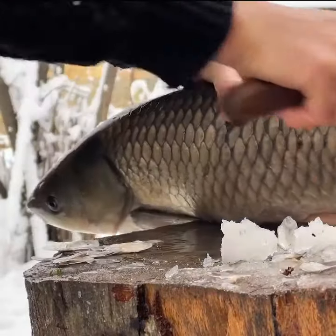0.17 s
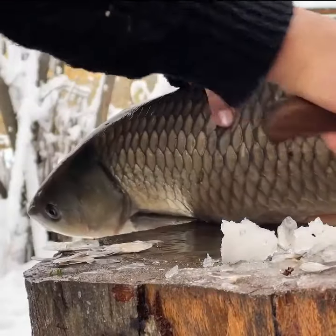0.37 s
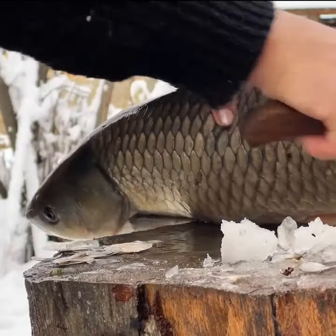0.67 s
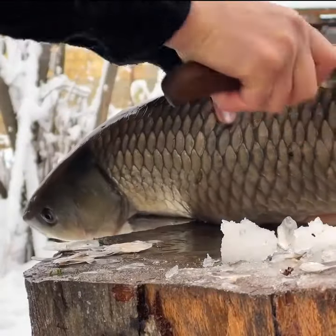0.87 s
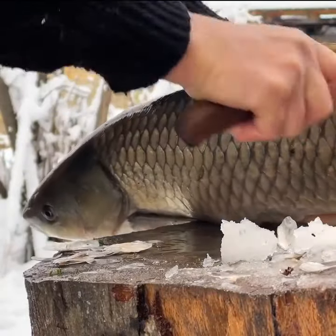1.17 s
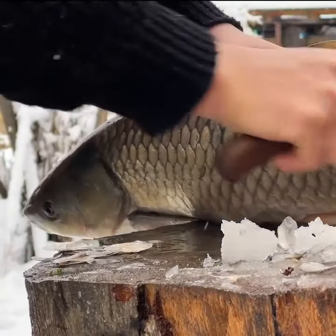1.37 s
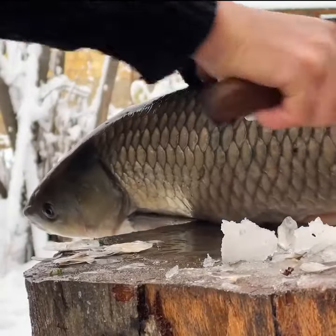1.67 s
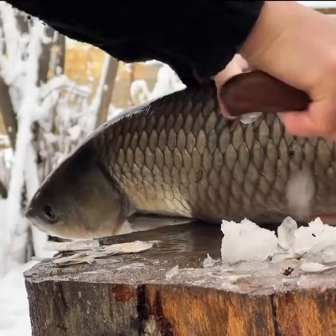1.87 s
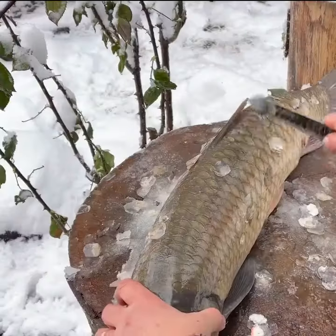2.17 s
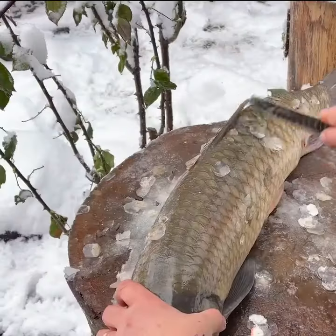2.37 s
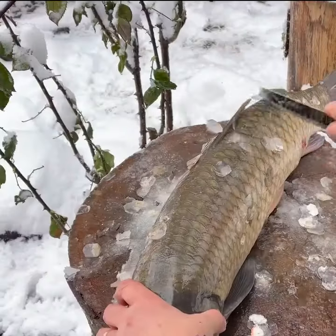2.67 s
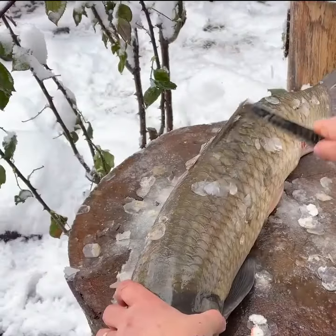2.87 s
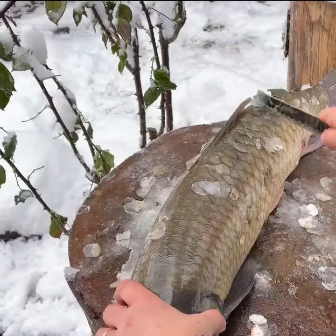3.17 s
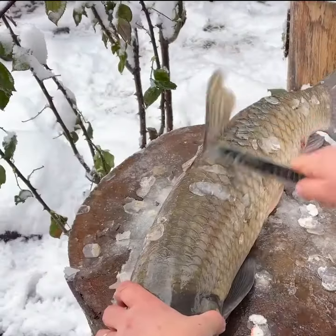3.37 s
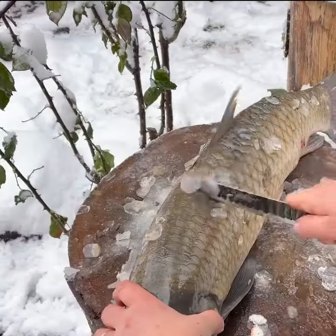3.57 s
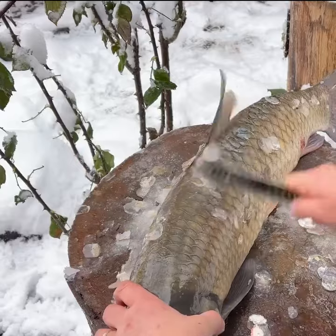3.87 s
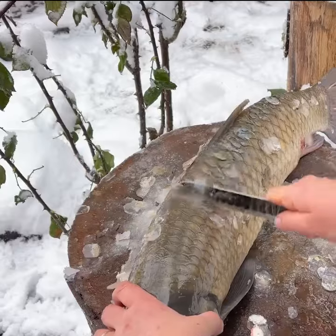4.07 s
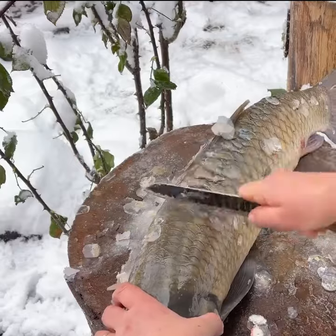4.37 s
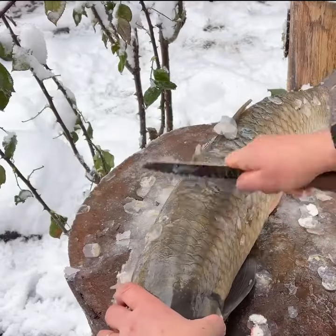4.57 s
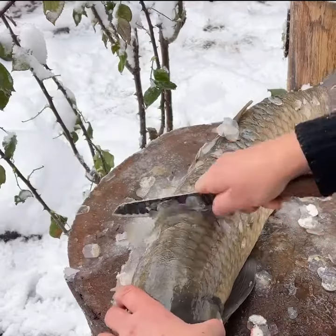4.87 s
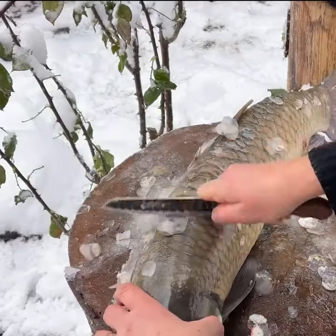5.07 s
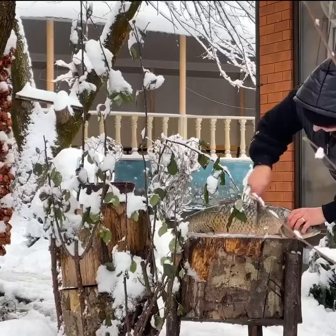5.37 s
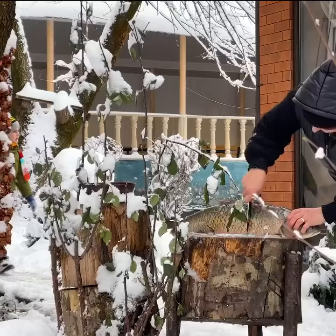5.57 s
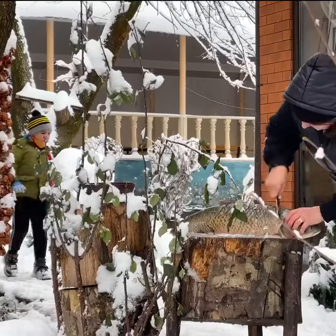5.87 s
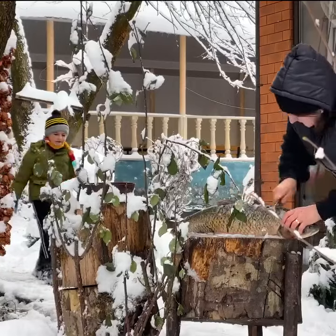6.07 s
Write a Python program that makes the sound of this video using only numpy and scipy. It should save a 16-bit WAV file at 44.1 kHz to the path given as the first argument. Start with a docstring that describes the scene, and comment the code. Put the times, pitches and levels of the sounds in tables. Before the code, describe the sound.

Fast rhythmic fish scaling outdoors: dry, gritty scrapes with sharp little snaps and soft body thumps, close at first, then suddenly faint and distant.

```python
"""A knife scales a big carp on a tree stump in a snowy yard, about six strokes a second.
Each stroke is a crackle of random slips with sharp noise-burst snaps and a dull push on the flesh;
the blade slides back lightly over wet skin, and the fish knocks, rings and thumps in falling tones.
It is heard from in front, from above, then from afar, over rumble and faint air. A low hum accompanies
the first place; a distant engine is a wavering tone whose pulls climb in pitch."""
import sys
import numpy as np
from scipy import signal
from scipy.fft import rfft, irfft, next_fast_len
from scipy.io import wavfile
from scipy.ndimage import uniform_filter1d, map_coordinates

SR = 44100
rng = np.random.default_rng(int(sys.argv[2]) if len(sys.argv) > 2 else 0)


def put_to_file(sound):
    """Save the sound as 16-bit audio at rate SR, in the file named by the first command-line argument."""
    columns = np.atleast_2d(sound).T  # one column per channel
    safe = np.clip(columns, -1, 1)
    whole_steps = np.round(safe * 32767)
    wavfile.write(sys.argv[1], SR, whole_steps.astype(np.int16))


N = 274302
T = np.arange(N) / SR

# blade strokes: (middle [s], half-power length [s], relative crackle level [dB],
# relative flesh level [dB], relative way-back level [dB], way back after the middle [s])
STROKES = [(0.108, 0.023, -33, -67, -44, 0.098), (0.263, 0.022, -33.5, -53, -50.5, 0.082),
           (0.416, 0.028, -34, -57, -46.5, 0.07), (0.568, 0.018, -31.5, -50, -49.5, 0.061),
           (0.722, 0.028, -32, -52, -51.5, 0.065), (0.872, 0.022, -36, -55.5, -48.5, 0.053),
           (1.026, 0.036, -41.5, -65.5, -48.5, 0.086), (1.162, 0.028, -37.5, -59, -49.5, 0.08),
           (1.305, 0.035, -41, -62, -49, 0.087), (1.471, 0.047, -43, -59, -52, 0.081),
           (1.632, 0.025, -40, -61, -46, 0.063), (1.778, 0.022, -35.5, -59, -51.5, 0.09),
           (1.938, 0.031, -37, -61, -48, 0.093), (2.111, 0.042, -35.5, -50.5, -45, 0.087),
           (2.271, .045, -36, -55, -55, 0.088), (2.431, .028, -37, -52, -61, 0.073),
           (2.588, 0.031, -36.5, -48.5, -64, 0.061), (2.75, 0.03, -36, -56, -61.5, 0.054),
           (2.917, 0.031, -37.5, -51, -55, 0.056), (3.076, 0.026, -35, -50.5, -58, 0.083),
           (3.241, 0.024, -36, -47.5, -54, 0.035), (3.403, 0.026, -30.5, -54, -68, 0.042),
           (3.572, 0.034, -38.5, -53, -60, 0.064), (3.728, 0.019, -40, -48, -52, 0.031),
           (3.892, 0.025, -34.5, -50.5, -49, 0.021), (4.048, 0.019, -38, -50.5, -54.5, 0.11),
           (4.209, 0.023, -33.5, -45, -54.5, 0.06), (4.356, 0.025, -35, -52, -52, 0.058),
           (4.521, 0.02, -37.5, -48, -51.5, 0.069), (4.693, 0.028, -35, -45, -54.5, 0.093),
           (4.848, 0.022, -35, -49.5, -59, 0.072), (5.016, .031, -33, -45.5, -53.5, 0.11),
           (5.188, 0.024, -35, -47, -55.5, 0.077), (5.359, 0.037, -46, -50, -78, 0.057),
           (5.51, 0.046, -59, -80, -65, 0.066), (5.67, 0.044, -63, -64.5, -67, 0.074),
           (5.769, 0.025, -61, -79, -62.5, 0.082), (5.879, 0.021, -65, -61, -67, 0.08),
           (5.976, 0.04, -68, -89, -59, 0.055), (6.095, 0.061, -74, -65, -68, 0.052)]
# changes of listening place: (time [s])
MOVES = [2.085, 5.44]


def amp(db):
    """Decibels to gain."""
    return 10 ** (np.asarray(db) / 20)


def unit(x):
    """x at rms 1."""
    return x / np.sqrt(np.mean(x ** 2) + 1e-20)


def noise():
    """White noise of rms 1."""
    return rng.standard_normal(N)


def pair(apart_db):
    """Two noises of joint rms 1: a common part plus independent parts at apart_db."""
    return unit(rng.standard_normal(N) + amp(apart_db) * rng.standard_normal((2, N)))


def wobble(rate_hz):
    """A smooth random curve, rate_hz knots a second."""
    knots = rng.standard_normal(int(N * rate_hz / SR) + 4)
    return map_coordinates(knots, [T * rate_hz])


def along(points, hz):
    """(frequency [Hz], value) points interpolated on a log axis."""
    f, v = np.transpose(points)
    return np.interp(np.log(hz + 1), np.log(f + 1), v)


def filtered(x, response):
    """x times a complex response of frequency."""
    m = next_fast_len(N + SR // 2)
    hz = np.fft.rfftfreq(m, 1 / SR)
    return irfft(rfft(x, m) * response(hz), m)[..., :N]


def coloured(x, points, size=4096):
    """x through a causal minimum-phase filter of energy 1 with the given colour."""
    gain = amp(along(points, np.fft.rfftfreq(size, 1 / SR)))
    cepstrum = irfft(np.log(gain))
    cepstrum[1:size // 2] *= 2
    cepstrum[size // 2 + 1:] = 0
    kick = irfft(np.exp(rfft(cepstrum)))
    kick /= np.linalg.norm(kick)
    return signal.fftconvolve(np.atleast_2d(x), kick[None], axes=1)[:, :N]


def dappled(x, depth_db, size=256, count=5):
    """Every scale has its own pitch: short time-frequency patches of random gain."""
    z = signal.stft(x, nperseg=size)[2]
    field = uniform_filter1d(rng.standard_normal(z.shape), size=count, axis=0)
    field = unit(uniform_filter1d(field, size=4, axis=1))
    gain = unit(amp(depth_db * np.clip(field, -2, 2)))
    return signal.istft(z * gain, nperseg=size)[1][:N]


def drone(hz):
    """A low tone of rms 1, unsteady in pitch and level."""
    pitch_waver, flutter_db = .022, 3.5  # pitch waver as a share of hz
    phase = 2 * np.pi * np.cumsum(hz * (1 + pitch_waver * wobble(29.05))) / SR
    return unit(amp(flutter_db * wobble(13)) * np.sin(phase))


def yard():
    """Each listening place has its own distant rumble and faint air; a low hum is heard at the first."""
    # background per listening place: (relative rumble level [dB], relative air level [dB])
    background = [(-57.5, -66.5), (-65.5, -69), (-67, -69)]
    # hum tones: (frequency [Hz], relative level [dB])
    hum_tones = [(125.5, -58.5), (104.4, -72)]
    # hum level over time: (time [s], gain [dB])
    hum_swell = [(0, -1.5), (.5, -8), (1, 1.5), (1.5, -2.5), (2.2, -10.5)]
    # rumble colour: (frequency [Hz], relative gain [dB])
    rumble_colour = [(20, -36), (40, -22), (60, -7), (85, 0.5), (125, 6.5), (170, -6.5), (250, -14),
                     (500, -27.5)]
    # air colour: (frequency [Hz], relative gain [dB])
    air_colour = [(25, -40), (100, 2.5), (250, 8), (500, -2), (1000, 0.5), (2000, -4), (5000, -21),
                  (16000, -6)]
    place = np.searchsorted(MOVES, T)
    levels_db = np.array(background, float)[place]
    rumble_db, air_db = uniform_filter1d(levels_db, size=4096, axis=0).T
    swell = amp(np.interp(T, *np.transpose(hum_swell)))
    hum = (place == 0) * swell * sum(amp(db) * drone(hz) for hz, db in hum_tones)
    rumble_gain = amp(rumble_db + 0.69 * wobble(8.8))
    rumble = rumble_gain * coloured(pair(apart_db=-17.5), rumble_colour)
    air_gain = amp(air_db + 1.5 * wobble(7.1) - 0.5)
    air = air_gain * coloured(pair(apart_db=-1.0), air_colour)
    return hum + rumble + air


def crackle(rate_hz, spread_db, life_s, hiss_db):
    """Envelope of random tiny slips on a steady bed, its power evened out over 34 ms."""
    slip_power = amp(spread_db * np.clip(noise(), -2, 2)) ** 2
    slips = (rng.random(N) < rate_hz / SR) * slip_power
    t = np.arange(SR // 40) / SR
    power = np.abs(signal.fftconvolve(slips, t * np.exp(-3 * t / life_s))[:N])
    power = power / power.mean() + amp(hiss_db) ** 2
    return np.sqrt(power / np.abs(uniform_filter1d(power, size=1500)))


def pressure(levels_db, stretch, skirt_db):
    """The blade bites abruptly in each stroke, lets go more slowly and drags on lightly afterwards."""
    power = np.zeros(N)
    for (s, length_s, *_), db in zip(STROKES, levels_db):
        near = slice(max(0, int((s - .1) * SR)), int((s + .2) * SR))
        u = (T[near] - s) / (length_s * stretch)
        bite = 2 ** -(np.abs(2 * u) ** np.where(u < 0, 2.6, 1.8))
        skirt = amp(skirt_db) ** 2 * np.exp(-((u - .6) / 2.0) ** 2)
        power[near] += amp(db) ** 2 * (bite + skirt)
    return np.sqrt(power)


def each_stroke(heights, offsets_s, width_s):
    """A smooth bump of 1/e half-width width_s at a given time from the middle of every stroke."""
    out = np.zeros(N)
    for s, height in zip(np.transpose(STROKES)[0] + offsets_s, heights):
        near = slice(*np.searchsorted(T, [s - 4 * width_s, s + 4 * width_s]))
        out[near] += height * np.exp(-((T[near] - s) / width_s) ** 2)
    return out


def scales():
    """The edge settles with a thin hiss; then rows of scales catch on it and flick back."""
    # hiss colour: (frequency [Hz], relative gain [dB])
    touch_colour = [(1000, 13), (6000, -11), (11000, -18), (14500, 14.5)]
    touch_db, touch_lead_s, touch_width_s = -17.5, 0.036, 0.01  # dB re the stroke's table level
    levels_db = np.transpose(STROKES)[2]
    bite = pressure(levels_db, stretch=1.0, skirt_db=-23.5)
    slips = crackle(rate_hz=800, spread_db=5.5, life_s=.0009, hiss_db=-5)
    touch = each_stroke(amp(levels_db + touch_db), -touch_lead_s, touch_width_s)
    crunch = dappled(bite * slips * noise(), depth_db=4, size=384, count=14)
    hiss = coloured(touch * slips * noise(), touch_colour)[0]
    return amp(1.5) * crunch + hiss


def lesser_snaps(count):
    """Every stroke frees a few more scales at random moments: rows like the placed snaps."""
    level_db, level_spread_db = -5.5, 1.2  # re the stroke's crackle column
    bright_db, bright_spread_db, thick_db = 3, 4, -10
    scatter_lengths = .33  # time scatter in stroke lengths
    chance = np.clip(rng.standard_normal((len(STROKES), count, 3)), -2, 2)
    rows = []
    for (s, length_s, crackle_db, *_), draws in zip(STROKES, chance):
        for when, force, tint in draws:
            snap_s = s + scatter_lengths * length_s * when
            snap_db = crackle_db + level_db + level_spread_db * force
            rows.append((snap_s, snap_db, bright_db + bright_spread_db * tint, thick_db))
    return [row for row in rows if T[SR // 20] < row[0] < T[-1]]


def snaps(size=900):
    """A scale bends, then tears loose with a short crack at its own pitch; thick ones pop lower."""
    # snaps and ticks at set times, loud and faint:
    # (time [s], relative level [dB], brightness [dB], relative thickness [dB])
    placed_snaps = [(0.088, -21, 7.5, -9), (0.1144, -19, 1, -20), (0.243, -28, -14, -10),
                    (0.2647, -14.5, -18, -4), (.395, -28, -18, -23), (0.412, -17.5, -9, 2),
                    (0.557, -24.5, -8, -9), (0.5635, -26.5, -8, 4), (0.584, -23, 2, -3),
                    (0.6255, -26.5, 9, -19), (0.71, -15, 17, -18), (0.7312, -20, -20, -15.5),
                    (0.7374, -21, -8, -13), (0.749, -28, -2, -15), (0.8775, -25.5, 1, -7),
                    (1.151, -33, 1, 2), (1.176, -23.5, -15, -13), (1.1845, -18.5, 5, -2.5),
                    (1.2946, -25.5, 6, 0.5), (1.3467, -26, 5, -20), (1.611, -28, 12, -14),
                    (1.642, -22.5, 4, -25), (1.679, -29, -3, -20), (1.7734, -25, 21, -20),
                    (1.9338, -19.5, -2.5, -42), (1.969, -26, -1, -16), (2.0014, -24.5, 1, -47),
                    (2.0897, -14.5, 11, -26), (2.4215, -20, 6.5, -25), (2.5076, -30.5, 9, -26),
                    (2.7625, -21.5, 4, -14), (2.813, -32.5, 7, -30), (2.86, -48.5, 0, -21),
                    (2.921, -23, 10, 7), (2.977, -36, 6, -28), (3.078, -17, 16, -23),
                    (3.118, -33.5, -3, -14), (3.2464, -18, 3.5, -26), (3.291, -35, -16, -28),
                    (3.4057, -14.5, 11, -20), (3.558, -21, -15, -11), (3.569, -21, -15, -13.5),
                    (3.613, -32.5, -2, -12), (3.7233, -10, 8, -8), (3.734, -19.5, -9.5, -27),
                    (3.8776, -22.5, -5, -6), (3.894, -15.5, 4, -15), (3.925, -27, -3, -9),
                    (3.948, -38, -14, -27), (4.036, -24.5, -3, -9), (4.2158, -24, -19, -21),
                    (4.368, -18.5, 2.5, -8), (4.412, -39, -12, -6), (4.5311, -17, -8, -13),
                    (4.6729, -22.5, 11, -25), (4.7025, -7.5, 11, -8), (4.829, -30, 1, -7),
                    (5.023, -14, 0.5, -16), (5.0377, -14, 2.5, -17), (5.198, -17, 9.5, -23),
                    (5.3771, -26.5, 3, -18)]
    bend_s, tear_s, decay_s = .0011, .0004, .0018
    click = 3.5  # instant of release, over the tearing noise
    lead = size // 4
    out = np.zeros(N + size)
    t = (np.arange(size) - lead) / SR
    hz = np.fft.rfftfreq(size, 1 / SR)
    bend = .5 * np.exp(-np.abs(t) / bend_s)
    tear = .7 * np.exp(-np.abs(t) / tear_s) + np.exp(-np.abs(t) / decay_s)
    envelope = np.where(t < 0, bend, tear)
    for s, db, bright_db, thick_db in placed_snaps + lesser_snaps(count=6):
        ring_hz = 6500 * np.exp(0.5 * rng.standard_normal())
        ring_db = 4 * np.exp(-(np.log((hz + 1) / ring_hz) / 0.092) ** 2)
        shape = [(2600, thick_db + 11.5), (4000, 0), (8500, 0.008), (12000, bright_db)]
        burst = rng.standard_normal(size) * envelope + click * (t == 0)
        crack = irfft(rfft(burst) * amp(along(shape, hz) + ring_db), size)
        start = round(s * SR) - lead
        out[start:start + size] += amp(db + 15.0) * crack / np.linalg.norm(crack)
    return out[:N]


def slime(rate_hz, pitch_hz, life_cycles, size=320):
    """Films of slime burst under the sliding blade: tiny decaying sine pops a few cycles long."""
    pops = rng.standard_normal((int(rate_hz * N / SR), 2))
    start = rng.integers(0, N, len(pops))
    t = np.arange(size) / SR
    cycles = pitch_hz * np.exp(0.28 * pops[:, :1]) * t
    strength = amp(4 * np.clip(pops[:, 1:], -2, 2))
    envelope = np.exp(-cycles / life_cycles) * (1 - np.exp(-cycles))
    grains = strength * np.sin(2 * np.pi * cycles) * envelope
    where = start[:, None] + np.arange(len(t))
    return unit(np.bincount(where.ravel(), grains.ravel(), N)[:N])


def slide():
    """The blade skims back over wet skin; the rubbing dips briefly before each stroke, deeper before a hard one."""
    return_width_s = 0.018
    resting_db, resting_delay_s, resting_width_s = -7, 0.076, 0.051  # light contact between strokes
    dip_db, dip_lead_s, dip_width_s = -8, .046, .011
    full_dip_db = -36  # crackle column at which the dip is deepest
    _, _, crackle_db, _, back_db, back_s = np.transpose(STROKES)
    force = np.clip(amp(crackle_db - full_dip_db), 0, 1) ** .5
    resting = amp(resting_db) * each_stroke(amp(back_db), resting_delay_s, resting_width_s)
    contact = resting + each_stroke(amp(back_db), back_s, return_width_s)
    dip = amp(dip_db * each_stroke(force, -dip_lead_s, dip_width_s) + wobble(30))
    ticks = crackle(rate_hz=800, spread_db=4, life_s=.0012, hiss_db=-3)
    skim = dappled(ticks * noise(), depth_db=2.2, size=512, count=24)
    pops = slime(rate_hz=200, pitch_hz=6300, life_cycles=8)
    return dip * (amp(3.0) * contact * skim + amp(-7.0) * resting * pops)


def flesh():
    """The slips shake the soft body of the fish, and the returning blade drags it lightly."""
    # flesh colour: (frequency [Hz], relative gain [dB])
    flesh_colour = [(25, -66), (55, -10.5), (130, 0.5), (220, 0), (350, -0.5), (500, -1.5), (800, -2.5),
                    (1200, -8.5), (2000, -9), (5000, -12)]
    drag_db, drag_delay_s, drag_width_s = -24.5, .06, 0.013  # dB re the push
    levels_db = np.transpose(STROKES)[3]
    push = pressure(levels_db, stretch=1.15, skirt_db=-14.0)
    drag = each_stroke(amp(levels_db + drag_db), drag_delay_s, drag_width_s)
    slips = crackle(rate_hz=360, spread_db=3, life_s=0.0028, hiss_db=-16.5)
    rub = amp(5.0) * np.hypot(push, drag) * slips * noise()
    return coloured(dappled(rub, depth_db=3.5, size=1024, count=4), flesh_colour)


def knocks():
    """The fish bumps the stump: a ragged slap whose highs arrive first, falling into a dull thump."""
    # knocks on the stump: (time of loudest pitch [s], relative peak [dB], loudest pitch [Hz])
    bumps = [(0.2676, -40, 1040), (0.4137, -35.5, 1115), (0.5654, -42, 716), (0.581, -42, 730),
             (0.7324, -40, 720), (.878, -46, 560), (1.1869, -39.5, 843), (2.1127, -35.5, 870),
             (2.1881, -39, 514), (2.2913, -41.5, 456), (2.3367, -39.5, 530), (2.4373, -43.5, 760),
             (2.7493, -42, 595), (2.868, -46.5, 467), (3.083, -36, 690), (3.2482, -38.5, 432),
             (3.2733, -44.5, 306), (3.406, -32, 550), (3.601, -42, 310), (3.725, -37.5, 776),
             (3.8964, -37.5, 446), (4.114, -48.5, 390), (4.1947, -35.5, 472), (4.202, -43, 199),
             (4.374, -50, 345), (4.5329, -30.5, 734), (4.6855, -36.5, 650), (4.7044, -39, 770),
             (4.72, -37.5, 320), (4.8299, -42, 494), (5.0153, -39, 456), (5.039, -32.5, 994),
             (5.192, -39, 393), (5.2062, -39.5, 360), (5.3693, -45, 468), (5.429, -48.5, 412),
             (5.571, -50, 400), (5.668, -55, 700), (5.878, -52.5, 780), (6.12, -56, 650)]
    sweep_cycles, sweep_spread = 2, 0.1571  # pitch = cycles / age; log spread between knocks
    head_octaves, tail_octaves = 1.35, .8  # 1/e widths above and below the loudest pitch
    rough, trim_db = .45, 1
    out = np.zeros(N + SR)
    age_s = np.arange(1, SR // 12) / SR
    band = signal.butter(2, [250, 1100], 'band', fs=SR, output='sos')
    for s, db, hz in bumps:
        cycles = sweep_cycles * np.exp(sweep_spread * rng.standard_normal())
        octaves = np.log2(cycles / age_s / hz)
        width = np.where(octaves > 0, head_octaves, tail_octaves)
        rattle, grit = unit(signal.sosfilt(band, rng.standard_normal((2, len(age_s)))))
        phase = 2 * np.pi * cycles * np.log(age_s) + rough * rattle
        tone = np.sin(phase) + rough * grit / 2
        start = round((s - cycles / hz) * SR)
        out[start:][:len(age_s)] += amp(db + trim_db) * tone * np.exp(-(octaves / width) ** 2)
    return out[:N]


def off_stump(x, delay_ms, strength):
    """From in front, the flat top of the stump adds one early reflection, weaker in the treble."""
    def response(hz):
        reflection = strength / (1 + (hz / 6000) ** 2)
        return 1 + reflection * np.exp(-2j * np.pi * hz * delay_ms / 1000)
    return filtered(x, response)


def echo(x, t60_s, size=8192):
    """Stump and house wall scatter a short, thin answer to each channel: decaying noise tails."""
    t = np.arange(size) / SR
    envelope = amp(-60 * t / t60_s) * (1 - np.exp(-t / .0027))
    tail = rng.standard_normal((2, size)) * envelope
    return signal.fftconvolve(x, tail / np.linalg.norm(tail[0]), axes=1)[:, :N]


def engine():
    """A distant engine climbs in pitch through each pull, the last one hardly at all."""
    # engine pulls: (start [s], end [s], start pitch [Hz], end pitch [Hz], level [dB])
    pulls = [(0.918, 1.027, 149.7, 166.6, -55), (2.362, 2.737, 84.5, 112.8, -56),
             (3.765, 4.705, 70, 89.7, -60.5), (4.688, 5.347, 87, 87.4, -62)]
    fade_s = .14
    out = np.zeros(N)
    for start, end, from_hz, to_hz, db in pulls:
        on = np.clip(np.minimum(T - start, end - T) / fade_s + .5, 0, 1)
        out += amp(db) * on * drone(np.interp(T, [start, end], [from_hz, to_hz]))
    return out


def from_left(x, lag_ms, sway_ms, direct):
    """The knife moves close on the left: the right hears it later, shaded, its treble mostly scattered."""
    # left channel's advantage: (frequency [Hz], advantage [dB])
    advantage = [(100, 2.5), (380, 3), (700, 1), (1250, 9.5), (2400, 11.5), (3300, 5.5), (4400, 4.5),
                 (6400, 10), (9000, 13.5), (11000, 10), (13000, 3), (15500, 5)]
    delay = (lag_ms + sway_ms * wobble(11.0)) * SR / 1000
    late = map_coordinates(x[0], [np.arange(N) - delay], order=5)
    # scattered paths change as the hand travels
    paths = echo(x, t60_s=.012)
    turn = 1.6 * wobble(12)
    scattered = np.cos(turn) * paths[0] + np.sin(turn) * paths[1]

    def share(hz):
        return np.clip(along([(250, .995), (450, .9), (800, direct)], hz), 0, 1)

    def both_sides(hz):
        shade = amp(-along(advantage, hz))
        return np.array([np.ones_like(hz), shade]) * np.sqrt(2 / (1 + shade ** 2))

    far = filtered(late, share) + filtered(scattered, lambda hz: np.sqrt(1 - share(hz) ** 2))
    return filtered(np.array([x[0], far]), both_sides)


def soft_rings(rows, sag):
    """A soft body swings for a few cycles, losing about the share sag of its pitch per half-width."""
    out = np.zeros(N)
    for (s, width_s, db, hz), phase in zip(rows, rng.uniform(0, 2 * np.pi, len(rows))):
        near = slice(*np.searchsorted(T, [s - 3 * width_s, s + 3 * width_s]))
        u = (T[near] - s) / width_s
        swing = np.sin(phase + 2 * np.pi * np.cumsum(hz * np.exp(-sag * u)) / SR)
        out[near] += amp(db) * np.exp(-u ** 2) * swing
    return out


def thumps():
    """The fish settles back on the stump after a push: low, sinking sine swells."""
    # settling thumps: (middle [s], 1/e half-width [s], peak [dB], pitch at the middle [Hz])
    settlings = [(2.205, 0.014, -48, 117), (2.297, 0.015, -49, 137), (2.443, .014, -51, 117),
                 (2.783, 0.014, -51, 119.3), (2.943, 0.012, -59, 129), (3.1, 0.015, -57, 125),
                 (3.278, 0.021, -49.5, 125.4), (3.6, 0.028, -51.5, 126.8), (3.74, 0.016, -52.5, 135.5),
                 (3.915, 0.021, -58, 137.4), (4.208, 0.012, -42, 137.4), (4.236, 0.0132, -43, 89.4),
                 (4.385, 0.015, -45, 105), (4.545, 0.017, -49.5, 116.5), (4.7, .018, -55, 149),
                 (4.745, 0.026, -46.5, 119.5), (5.03, 0.024, -58, 145.5), (5.21, .018, -57, 128.4)]
    return soft_rings(settlings, sag=0.1143)


def booms():
    """The hollow belly rings under a hard push: short, sinking sine swells."""
    # belly rings: (middle [s], 1/e half-width [s], peak [dB], pitch at the middle [Hz])
    belly_rings = [(2.289, .011, -46.5, 393), (2.338, 0.0054, -44, 411), (2.87, .009, -63, 370),
                   (3.406, .008, -45.5, 402), (4.72, .012, -51, 316), (5.02, 0.016, -39.5, 357.7),
                   (5.188, .012, -42, 309)]
    return soft_rings(belly_rings, sag=0.086)


def swishes(rows, colour):
    """Soft, grainy swells: smooth bumps on crackling, coloured noise."""
    swell = sum(amp(db) * np.exp(-((T - s) / width_s) ** 2) for s, width_s, db in rows)
    grain = crackle(rate_hz=700, spread_db=3, life_s=.002, hiss_db=-2)
    return coloured(swell * grain * noise(), colour)


def breath():
    """Faint breathy swishes around 2-3 kHz."""
    # breathy swishes: (middle [s], 1/e half-width [s], level [dB])
    breaths = [(5.485, .03, -61.5), (5.55, 0.075, -62.5), (5.635, 0.0081, -62.5), (5.672, 0.009, -56),
               (5.882, 0.017, -68)]
    # breath colour: (frequency [Hz], relative gain [dB])
    breath_colour = [(400, -4), (1200, -9), (2000, -5), (2600, -1), (3500, -13), (6000, -21)]
    return swishes(breaths, breath_colour)


def skims():
    """Long, light skims make the blade sing: swishes with the blade's peaked colour."""
    # blade skims: (middle [s], 1/e half-width [s], level [dB])
    light_skims = [(5.772, 0.022, -62), (5.988, 0.013, -53), (6.06, .026, -59.5), (6.115, .014, -76),
                   (6.192, 0.026, -56)]
    # blade colour: (frequency [Hz], relative gain [dB])
    blade_colour = [(1500, -16), (3100, -7), (3800, -10), (4700, 4.5), (5600, -14), (6600, -6), (7800, -8),
                    (9000, 4), (10800, -9), (15000, -2.5)]
    return swishes(light_skims, blade_colour)


def scene():
    """The same work from three listening places, in the yard's background."""
    # crackle colour from in front: (frequency [Hz], relative gain [dB])
    front_colour = [(300, -22), (900, -8), (1300, -9.5), (1700, -7.5), (3200, -5), (4200, -2.5), (5200, 3),
                    (6800, 0.5), (9000, -1.5), (11000, -2), (13000, 5), (15800, 2)]
    # wet skin colour from in front: (frequency [Hz], relative gain [dB])
    wet_colour = [(500, -14.5), (1700, -12), (2100, -5.5), (3000, -9), (4300, -3.5), (5800, 4.5), (6700, 4),
                  (8500, -2), (11000, 0.5), (13500, 7.5), (15800, 2)]
    # crackle and skin colour from above: (frequency [Hz], relative gain [dB])
    above_colour = [(300, -20.5), (900, -6), (1300, -7), (1800, -5), (2700, -1), (3300, -3), (4300, -1.5),
                    (6400, -1), (8000, 1), (11000, -1.5), (13000, 1), (15800, 0.5)]
    # crackle and skin colour from afar: (frequency [Hz], relative gain [dB])
    afar_colour = [(300, -44), (900, -4), (1700, -4), (2600, -3.5), (3500, 2.5), (5000, 2.5), (9000, 2.5),
                   (11500, 5), (15500, 8)]
    edge = scales() + snaps()
    skin = slide()
    body = flesh() + knocks() + booms() + thumps()
    first, second, third = (np.searchsorted(MOVES, T) == k for k in range(len(MOVES) + 1))

    front = coloured(edge * first, front_colour) + coloured(skin * first, wet_colour)
    front = front + body * first * amp([[1], [-1.5]])  # left, right [dB]
    front = off_stump(front, delay_ms=1.98, strength=0.11)
    above = coloured((edge + skin) * second, above_colour) + body * second
    above = from_left(above, lag_ms=0.14, sway_ms=0.015, direct=0.44)
    afar = coloured((edge + skin) * third, afar_colour) + body * third + breath() + skims()

    near = front + above
    near = near + amp(-9.5) * echo(near, t60_s=.011)
    afar = afar + amp(-11) * echo(afar, t60_s=0.095)
    return near + afar + engine() + yard()


def record(dry):
    """Band limit: a 100 Hz wide fade to nothing around top_hz."""
    top_hz = 16000
    return filtered(dry, lambda hz: np.clip((top_hz - hz) / 100 + .5, 0, 1))


dry = scene()
out = record(dry)
put_to_file(out)
```